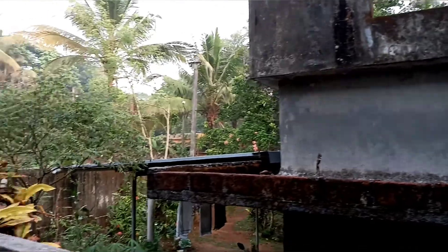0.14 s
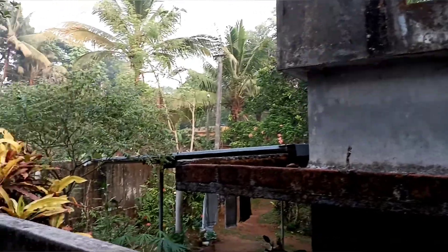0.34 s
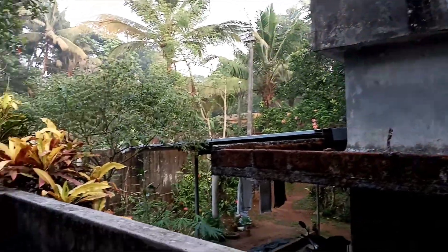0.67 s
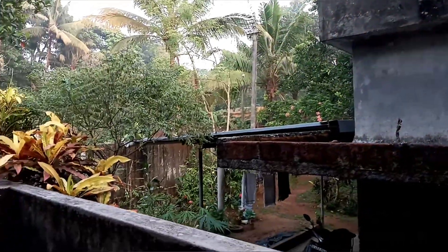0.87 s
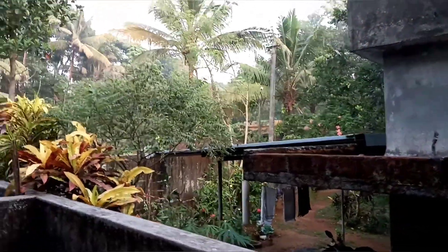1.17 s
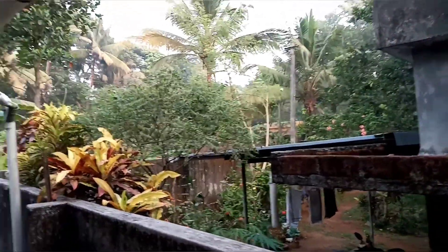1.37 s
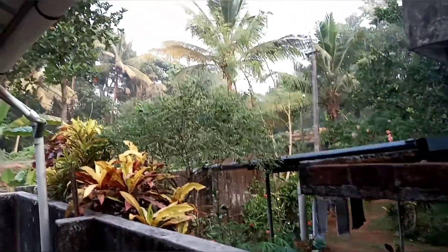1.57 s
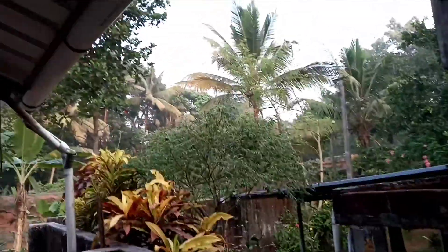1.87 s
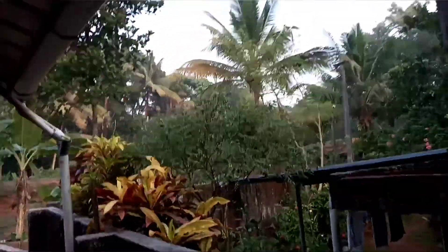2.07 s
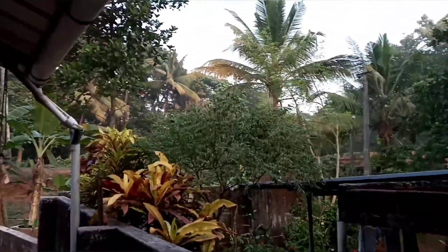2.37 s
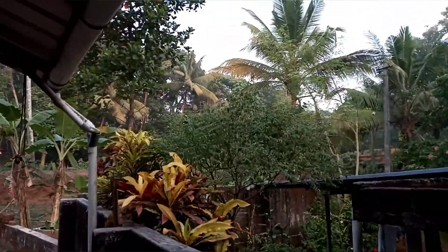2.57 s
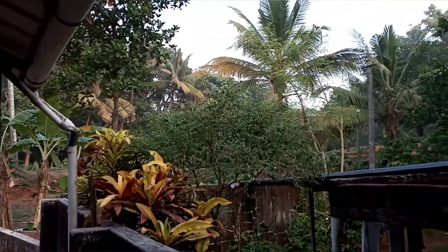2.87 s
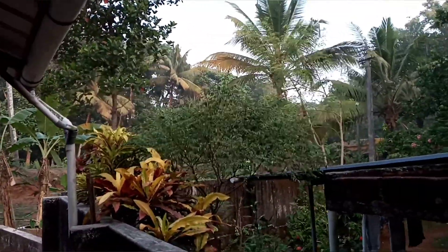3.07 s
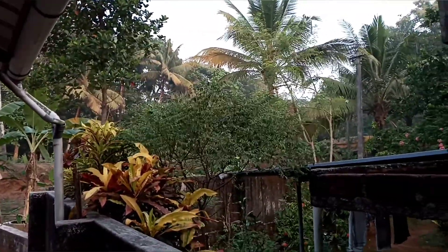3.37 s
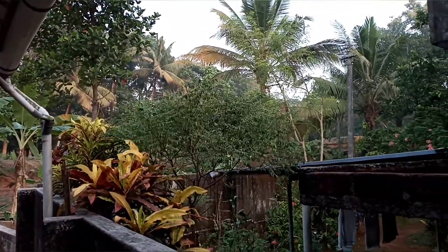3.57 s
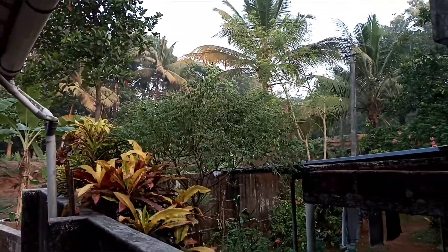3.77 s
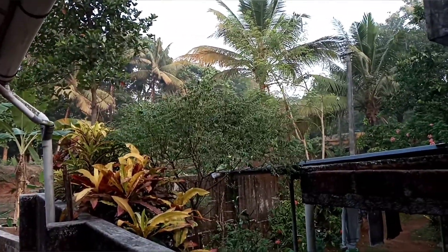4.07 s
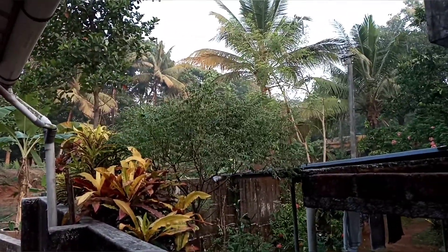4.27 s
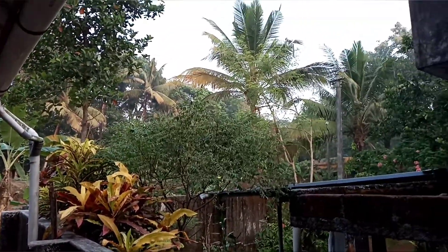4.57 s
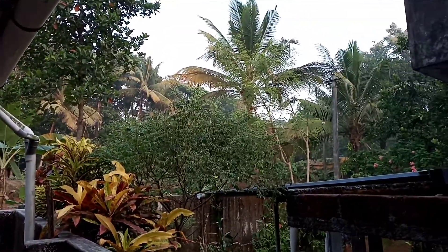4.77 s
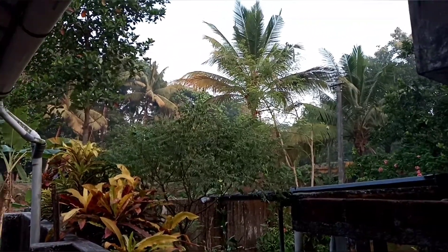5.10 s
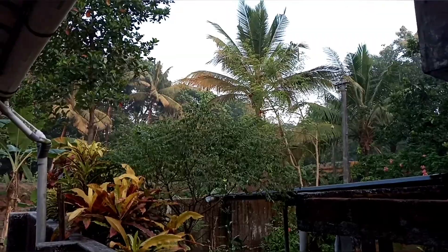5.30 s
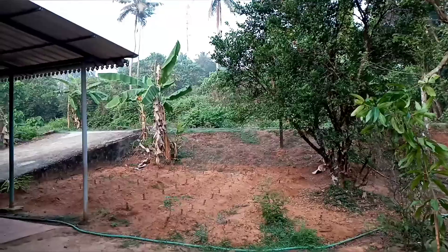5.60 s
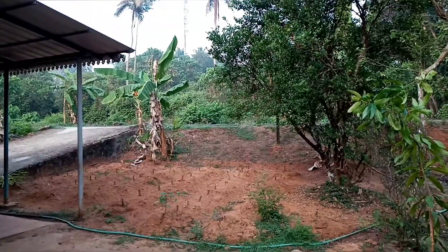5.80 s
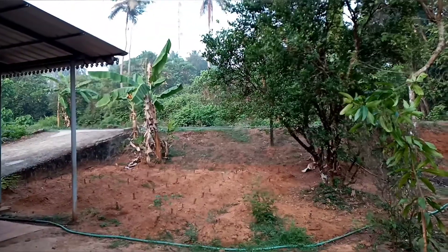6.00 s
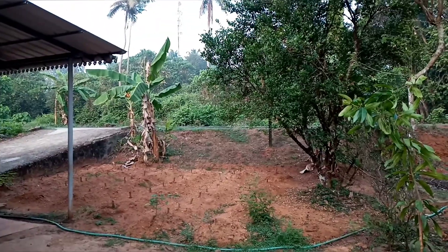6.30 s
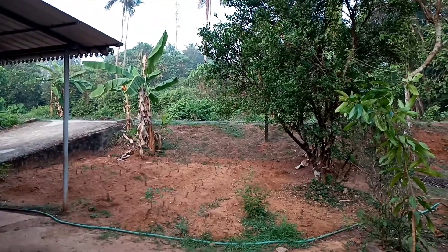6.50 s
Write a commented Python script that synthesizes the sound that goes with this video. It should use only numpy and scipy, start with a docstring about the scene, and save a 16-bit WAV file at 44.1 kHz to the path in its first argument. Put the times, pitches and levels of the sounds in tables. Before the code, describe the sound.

Lively tropical garden birds at dawn: a steady hollow tooting, falling whistles, buzzes and chirps over shrill insects, with a sharp click and handling knocks.

```python
"""Buzzing notes, scolding and a thin held whistle open a tropical garden at dawn, over shrill insects.
A barbet then toots steadily, a second bird whistles falling phrases and small birds chirp among the trees.
Close by: a sharp click, a short scuff, dry ticks, soft knocks on the case and a late thump on the microphone.
For the last second the terrace gives way to the open yard: fainter insects, a stronger breeze, a far crow.
Birds are gliding or shaken sines with random echoes; insects and air are filtered noise; knocks ring modes."""
import sys
import numpy as np
from scipy import signal
from scipy.fft import rfft, irfft, next_fast_len
from scipy.io import wavfile

SR = 44100
rng = np.random.default_rng(int(sys.argv[2]) if len(sys.argv) > 2 else 0)


def wrap_up_sound(samples):
    """Save the sound to the file named by the first command line argument, as 16-bit audio."""
    columns = np.atleast_2d(samples).T
    # keep every value between -1 and 1, then stretch to whole-number steps
    tamed = np.clip(columns, -1, 1)
    steps = np.round(tamed * 32767).astype(np.int16)
    wavfile.write(sys.argv[1], SR, steps)


N = 293265
TIME = np.arange(N) / SR
YARD_S = 5.575   # terrace before, open yard after
FLUTTER_DB, FLUTTER_PER_S = 3, 140   # quick flicker in the strength of every note
RASP_SPREAD = 0.1314   # half width as a share of the centre pitch


def from_db(db):
    """Decibels to gain."""
    return 10 ** (np.asarray(db) / 20)


def rms_one(x):
    """Scale to unit rms."""
    return x / np.sqrt(np.mean(x ** 2) + 1e-20)


def add(out, start_s, sound):
    """Mix a sound in at a time, cut at the end of the scene."""
    start = int(start_s * SR)
    out[start:start + len(sound)] += sound[:N - start]


def band(x, low_hz, high_hz, order=2):
    """Butterworth band-pass."""
    sos = signal.butter(order, [low_hz, high_hz], "band", fs=SR, output="sos")
    return signal.sosfilt(sos, x)


def drift(rate_per_s, count=N):
    """Random wander: straight lines between normal draws of spread 1."""
    steps = np.arange(count) * rate_per_s / SR
    knots = int(steps[-1]) + 2
    return np.interp(steps, np.arange(knots), rng.standard_normal(knots))


def coloured(spectrum):
    """Noise of unit rms whose spectrum follows a curve over log frequency."""
    curve_hz, curve_db = np.transpose(spectrum)
    size = next_fast_len(N)
    bin_hz = np.arange(size // 2 + 1) * SR / size
    gain = from_db(np.interp(np.log(bin_hz + 1), np.log(curve_hz), curve_db))
    return rms_one(irfft(rfft(rng.standard_normal(size)) * gain, size)[:N])


def noise_band(low_hz, high_hz, order=2):
    """Band of noise of unit rms."""
    return rms_one(band(rng.standard_normal(N), low_hz, high_hz, order=order))


def ring(force, hz, t60_s):
    """Two-pole resonator: a unit impulse starts a decaying sine of height about 1."""
    radius = from_db(-60 / (t60_s * SR))
    angle = 2 * np.pi * hz / SR
    poles = [1, -2 * radius * np.cos(angle), radius * radius]
    return signal.lfilter([0, np.sin(angle)], poles, force + 1e-18)


def envelope(start_s, attack_s, hold_s, release_s):
    """Straight rise, hold and straight fall."""
    corners_s = np.cumsum([0, attack_s, hold_s, release_s])
    return np.interp(TIME - start_s, corners_s, [0, 1, 1, 0])


def garden(x, wet_db, t60_s, echoes_per_s=900):
    """Trunks, leaves and walls return many small echoes that die away."""
    t = TIME[:SR]
    present = (rng.random(SR) < echoes_per_s / SR) * (t > .012)
    echoes = rng.standard_normal(SR) * present * np.exp(-np.log(1000) * t / t60_s)
    wet = signal.fftconvolve(x, echoes / np.sqrt(np.sum(echoes ** 2)))[:N]
    return x + from_db(wet_db) * wet


def far_off(x, direct_db, t60_s):
    """Foliage weakens the direct sound, so that the echoes carry the call."""
    return from_db(direct_db) * garden(x, wet_db=-direct_db, t60_s=t60_s, echoes_per_s=2000)


def slur(length_s, start_hz, middle_hz, end_hz, waver, edge, harmonics=((1, 0),), swell_db=0,
         wavers_per_s=250):
    """A wavering tone gliding through three pitches, its level sloping by swell_db, as from a syrinx; rms 1."""
    u = np.linspace(0, 1, int(length_s * SR))
    glide = np.polyfit([0, .5, 1], [start_hz, middle_hz, end_hz], 2)
    hz = np.polyval(glide, u) * (1 + waver * drift(wavers_per_s, count=len(u)))
    phase = 2 * np.pi * np.cumsum(hz) / SR
    tone = sum(from_db(db) * np.sin(k * phase) for k, db in harmonics)
    strength = from_db(swell_db * u + FLUTTER_DB * drift(FLUTTER_PER_S, count=len(u)))
    return rms_one(tone * strength * signal.windows.tukey(len(u), edge))


def notes(table, **voice):
    """Slurred notes, each at its time and rms level."""
    out = np.zeros(N)
    for start_s, length_s, start_hz, middle_hz, end_hz, level_db in table:
        add(out, start_s, from_db(level_db) * slur(length_s, start_hz, middle_hz, end_hz, **voice))
    return out


def rasp(length_s, centre_hz, width_hz):
    """A tone shaken fast and unevenly in pitch; rms 1."""
    size = int(length_s * SR)
    hz = centre_hz + 0.837 * width_hz * drift(900, count=size)
    tone = np.sin(2 * np.pi * np.cumsum(hz) / SR) * signal.windows.tukey(size, .5)
    return rms_one(band(tone, centre_hz - width_hz, centre_hz + width_hz))


def air():
    """Open air, a settling distant rumble, breeze, dull bumps and a low thump of the hand on the microphone."""
    # relative spectrum: centre_hz, level_db_per_hz
    air_colour = [(25, -14), (50, -23), (90, -1.5), (140, 0.5), (190, 4.5), (250, -4.5), (340, -5),
                  (520, -14.5), (1000, -14.5), (1700, -13), (3000, -19), (5500, -32), (11000, -38.5),
                  (13500, -39.5), (15300, -34)]
    # low swells, first a gust, then part of the hand thump: peak_s, half_length_s (to 1/e), level_db
    low_swells = [(1.797, 0.55, -76), (6.6, 0.029, -51.5)]
    # low wavering notes, dull bumps and last the hand thump: start_s, length_s, centre_hz, level_db
    low_notes = [(.33, 0.082, 198.8, -64), (0.521, 0.064, 284, -68), (0.708, 0.081, 207, -59),
                 (0.936, 0.075, 300, -67.5), (1.301, 0.12, 319, -67.5), (1.5, 0.048, 176, -73),
                 (1.84, 0.058, 147, -64.5), (2.02, 0.071, 139.1, -63), (2.42, 0.086, 329, -66.5),
                 (5.381, 0.27, 312.4, -68.5), (6.631, 0.0268, 101, -37.5)]
    terrace_breeze_db, yard_breeze_db = -81.5, -64
    rumble_db, rumble_fade_db_per_s = -80.5, 5

    flow = from_db(np.where(TIME < YARD_S, terrace_breeze_db, yard_breeze_db))
    for peak_s, half_length_s, level_db in low_swells:
        flow = flow + from_db(level_db) * np.exp(-((TIME - peak_s) / half_length_s) ** 2)
    low_noise = flow * from_db(4.0 * drift(15)) * noise_band(56, 116, order=3)

    bumps_and_thump = notes([(start_s, length_s, hz, hz, hz, db) for start_s, length_s, hz, db in low_notes],
                            waver=0.11, edge=0.47)
    lumps_db = 5.6 * drift(12)
    rumble = from_db(rumble_db - rumble_fade_db_per_s * TIME + lumps_db) * noise_band(150, 350, order=3)
    return from_db(-68) * coloured(air_colour) + low_noise + rumble + bumps_and_thump


def insects():
    """Each choir is a narrow shrill band of noise that throbs unevenly."""
    # choirs: centre_hz, width_hz, level_db, throbs_per_s, throb_depth (0-1), yard_change_db
    choirs = [(4675, 480, -71, 2.7, 0.41, -6), (6225, 207, -66, 27, 0.11, -9),
              (6537, 300, -68, 20, 0.4, -9.5), (7884, 260, -71.5, 9.5, 0.75, -17),
              (7480, 580, -77, 3.5, 0.3, -18), (9076, 700, -66, 40, 0.24, -5)]
    out = np.zeros(N)
    in_yard = np.clip((TIME - YARD_S) / 0.02, 0, 1)
    for centre_hz, width_hz, level_db, throbs_per_s, depth, yard_change_db in choirs:
        rate_per_s = throbs_per_s * (1 + .7 * drift(18))
        beat = np.sin(2 * np.pi * np.cumsum(rate_per_s) / SR)
        throb = (1 + depth * beat) * from_db(0.56 * drift(9))
        choir = noise_band(centre_hz - width_hz / 2, centre_hz + width_hz / 2)
        out += from_db(level_db + yard_change_db * in_yard) * throb * choir
    return band(out, 4160, 9520, order=10)


def flock(low_hz, high_hz, spread_db, count):
    """Short glides at random pitches and strengths, blurred by the trees; rms 1."""
    out = np.zeros(N)
    for k, (when, pitch, length, glide, strength) in enumerate(rng.random((count, 5))):
        hz = low_hz * (high_hz / low_hz) ** pitch
        bend = 0.206 * (glide - .5)
        call = slur(0.0305 + 0.0509 * length, hz * (1 - bend), hz, hz * (1 + bend), waver=0.017, edge=0.95)
        add(out, (k + when) / count * TIME[-1], from_db(spread_db * strength) * call)
    return rms_one(far_off(out, direct_db=-25.5, t60_s=0.49))


def chorus(low_voices_db=-14):
    """Many farther birds chirp at random, with a few low voices beneath, on a moving level."""
    # loudness curve, of which only the scaled swing about its mean is used: time_s, level_db
    loudness = [(0.0, -74.5), (1.84, -77), (2.11, -70.5), (2.59, -71), (3.64, -91.5), (4.3, -73.5),
                (5.1, -94.5), (6.6, -89.5)]
    mean_db, swing_share = -73.5, 0.57
    curve_db = np.interp(TIME, *np.transpose(loudness))
    level_db = mean_db + swing_share * (curve_db - curve_db.mean())
    high_voices = flock(1650, 5200, spread_db=10.5, count=380)
    low_voices = flock(512, 1487, spread_db=4.5, count=70)
    return from_db(level_db) * (high_voices + from_db(low_voices_db) * low_voices)


def handling():
    """Soft knocks of the hand ring the low modes of the case; the scuff is a dense grainy rub."""
    # hand on case: start_s, level_db, hardness (0-1)
    hand_knocks = [(0.669, -43.5, 0.13), (4.305, -35, .05), (5.3656, -32, 1), (5.466, -42, .03),
                   (5.57, -49, 0.8), (6.091, -43, .03), (6.63, -33.5, .03)]
    # case resonances: mode_hz, level_db, t60_s
    case_modes = [(239, -20.5, 0.021), (370, 0.5, 0.03), (1210, -4.5, 0.0072), (1490, -2, 0.0056)]
    # rubs: start_s, attack_s, hold_s, release_s, level_db, hiss_db (relative to the grain)
    rubs = [(3.901, 0.026, 0.052, 0.053, -36, -32), (3.995, 0.01, 0.011, 0.018, -43.5, -7.5)]
    # relative spectrum of the rub: centre_hz, level_db_per_hz
    rub_colour = [(59, -54), (100, -38), (184, -10), (248, -22.5), (654, -13), (1090, -13), (1340, -1.5),
                  (2000, -3), (2870, -0.5), (4560, -13.5), (6260, -13), (8230, -28), (9340, -29),
                  (10800, -52), (15500, -36)]

    force = np.zeros(N)
    for start_s, level_db, hardness in hand_knocks:
        # a softer contact lasts longer
        contact = signal.windows.hann(int(SR * 0.0023 * (1.08 - hardness)) + 3)
        add(force, start_s - .001, from_db(level_db) * contact / contact.sum())
    knocks = sum(from_db(db) * ring(force, hz, t60_s) for hz, db, t60_s in case_modes)

    scuff = np.zeros(N)
    for start_s, attack_s, hold_s, release_s, level_db, hiss_db in rubs:
        grain = coloured(rub_colour) + from_db(hiss_db) * noise_band(4000, 6700, order=3)
        strength = from_db(level_db + 1.8 * drift(500))
        scuff += envelope(start_s, attack_s, hold_s, release_s) * strength * grain
    return band(knocks, 128, 1900, order=3) + scuff


def ticks():
    """Tiny dry snaps of twigs and leaves: fast-dying band-passed crackle with a short echo."""
    # snaps: start_s, level_db (before trim), centre_hz, t60_s
    snaps = [(0.371, -42, 5400, .045), (0.371, -43, 2870, 0.047), (0.751, -58, 2960, 0.047),
             (.895, -52.5, 6900, 0.12), (.905, -70, 13150, 0.057), (1.246, -57, 3750, .025),
             (1.816, -50.5, 6845, 0.14), (1.826, -35, 6700, .025), (1.825, -66, 13000, 0.056),
             (1.8245, -46, 2950, 0.066), (1.8433, -49, 3800, 0.014), (1.8712, -38.5, 5550, 0.0089),
             (1.883, -46, 6700, 0.036), (1.9834, -50.5, 6300, 0.091), (2.614, -52, 10900, 0.012),
             (4.146, -45, 2000, 0.057), (4.384, -56, 6200, 0.14), (5.834, -49.5, 4900, 0.02),
             (6.25, -48.5, 1410, 0.026), (6.288, -68, 1400, 0.042), (6.584, -53, 1650, 0.08),
             (6.631, -54.5, 1560, 0.13)]
    trim_db = -2.5
    out, t = np.zeros(N), TIME[:SR // 8]
    for start_s, level_db, hz, t60_s in snaps:
        crackle = rng.standard_normal(len(t)) * from_db(3.1 * drift(700, count=len(t)))
        burst = rms_one(band(crackle, hz * 0.64, hz * 1.22, order=3))
        add(out, start_s, from_db(level_db + trim_db) * burst * np.exp(-np.log(1000) * t / t60_s))
    return garden(out, wet_db=-4.5, t60_s=0.13)


def click(tail_db=-42.0, tail_t60_s=0.21):
    """A small hard part snaps and rebounds, ringing its modes, and echoes briefly under the roof."""
    # snap and rebounds: start_s, level_db
    impacts = [(3.3345, -29), (3.3362, -33.5), (3.3422, -46)]
    # resonances of the part: mode_hz, level_db, t60_s
    part_modes = [(780, -15.5, 0.071), (1450, -9, .025), (2210, -0.5, 0.017), (2510, -4, 0.018),
                  (3600, -8, 0.016), (4480, -6, 0.015), (5830, -14, 0.013), (7100, -15, 0.013),
                  (8800, -9.5, 0.006)]
    # relative spectrum of the echo: centre_hz, level_db_per_hz
    tail_colour = [(180, -44), (300, -17), (821, -0.5), (1300, -6), (2040, -0.5), (2400, -7), (7020, -7),
                   (9290, -19), (10400, -37), (15500, -39)]

    hits = np.zeros(N)
    for start_s, level_db in impacts:
        add(hits, start_s, from_db([level_db]))
    body = np.zeros(N)
    for k, (hz, level_db, t60_s) in enumerate(part_modes):
        body += from_db(level_db) * (-1) ** k * ring(hits, hz, t60_s)   # alternate signs

    since_s = TIME - impacts[0][0]
    decay = (since_s > 0) * np.exp(-np.log(1000) * abs(since_s) / tail_t60_s)
    return body + from_db(tail_db) * decay * coloured(tail_colour)


def crow():
    """Hoarse fluttering caws: the yard hears the dying echo of the first caw, then the second caw."""
    # caws: start_s, length_s, start_hz, middle_hz, end_hz, level_db (before hoarseness and filtering)
    caw_notes = [(5.385, 0.169, 518, 550, 514, -51.5), (5.672, 0.182, 509.6, 544.3, 501, -49.5)]
    # voice: harmonic_number, level_db
    caw_harmonics = [(2, -14.5), (3, -4), (4, 0), (5, -24)]
    hoarseness, echo_db = .62, -6.5
    caws = notes(caw_notes, waver=0.031, edge=0.37, harmonics=caw_harmonics, wavers_per_s=660)
    caws = caws * (1 + hoarseness * drift(560))
    direct = band(caws, 1100, 2330, order=3)
    # the trees return mostly the upper part
    echoes = far_off(band(caws, 1670, 2840), direct_db=-22, t60_s=0.68)
    return (direct + from_db(echo_db) * echoes) * (TIME > YARD_S)


def buzz(length_s=0.075, centre_hz=4600, width_hz=610, pulses_per_s=210, jitter=0.25):
    """A very fast, uneven train of tiny pips, each sweeping down in pitch; rms 1."""
    size = int(length_s * SR)
    cycle = np.cumsum(pulses_per_s * (1 + jitter * drift(300, count=size))) / SR % 1
    hz = centre_hz + width_hz * (1 - 2 * cycle + 0.28 * drift(398, count=size))
    pips = np.sin(np.pi * cycle) ** 2 * np.sin(2 * np.pi * np.cumsum(hz) / SR)
    return rms_one(pips * signal.windows.tukey(size, .4))


def rasps():
    """Buzzing notes and broad scolding calls from the bushes, and low hoarse calls beyond them."""
    # one bird's buzz: start_s, level_db
    buzz_notes = [(0, -61), (0.064, -60.5), (0.271, -58.5), (0.489, -57.5), (0.722, -59), (4.507, -58.5),
                  (4.725, -55.5)]
    # scolds: start_s, length_s, centre_hz, level_db
    scold_notes = [(0, 0.08, 9000, -59.5), (.72, 0.15, 7100, -74), (1.14, 0.13, 6310, -63.5),
                   (1.687, 0.085, 5400, -64), (1.69, 0.094, 7250, -63.5), (1.711, 0.22, 4320, -63.5),
                   (1.925, 0.048, 3100, -62.5), (2.274, 0.085, 7100, -75), (2.298, 0.34, 4300, -68.5),
                   (2.32, 0.19, 3090, -69), (2.397, 0.1, 6170, -61.5), (2.627, 0.15, 2730, -82),
                   (2.761, 0.29, 4570, -68.5), (4.339, 0.087, 6260, -62), (4.501, 0.18, 5700, -81),
                   (4.725, 0.043, 5940, -64), (5.569, 0.024, 3410, -65), (5.752, 0.082, 7000, -73),
                   (6.107, 0.076, 3480, -69.5)]
    # low calls: start_s, length_s, pitch_hz, level_db
    low_calls = [(0.026, 0.099, 722, -69.5), (0.362, 0.054, 1128, -66), (2.658, 0.25, 1129, -75.5)]

    buzzes, scolds = np.zeros((2, N))
    for start_s, level_db in buzz_notes:
        add(buzzes, start_s, from_db(level_db) * buzz())
    for start_s, length_s, hz, level_db in scold_notes:
        add(scolds, start_s, from_db(level_db) * rasp(length_s, hz, RASP_SPREAD * hz))
    scolds = band(scolds, 2000, 9500, order=8)
    low = notes([(start_s, length_s, hz, hz, hz, db) for start_s, length_s, hz, db in low_calls],
                waver=0.082, edge=0.4)
    return garden(buzzes, wet_db=-1, t60_s=0.22) + garden(scolds + low, wet_db=-1.0, t60_s=0.32)


def chirps(table, waver, waver_per_octave=0.048, arch_octaves=.025, arch_share=.15):
    """Short glides bowed upward in the middle; the wider the glide, the more bowed and rougher."""
    out = np.zeros(N)
    for start_s, length_s, hz, glide_octaves, level_db in table:
        arch = arch_octaves + arch_share * abs(glide_octaves)
        start_hz, end_hz = hz * 2 ** (np.array([-glide_octaves, glide_octaves]) / 2 - arch)
        roughness = waver + waver_per_octave * abs(glide_octaves)
        chirp = slur(length_s, start_hz, hz, end_hz, waver=roughness, edge=0.31, wavers_per_s=400)
        add(out, start_s, from_db(level_db) * chirp)
    return out


def tsips():
    """Thin falling notes with a strong octave, each breaking into a short rasp just below it."""
    # calls: start_s, level_db
    tsip_notes = [(.062, -59), (1.09, -58), (2.835, -63), (3.42, -58.5), (3.839, -60.5), (4.685, -63),
                  (5.299, -61), (5.564, -70), (6.105, -68)]
    end_length_s, end_hz, end_db = 0.039, 3360, -10.5
    out = np.zeros(N)
    for start_s, level_db in tsip_notes:
        tsip = slur(0.02, 3820, 3720, 3560, waver=.012, edge=.5, harmonics=((1, 0.25), (2, -1.1)))
        ending = rasp(end_length_s, end_hz, RASP_SPREAD * end_hz)
        add(out, start_s, from_db(level_db) * tsip)
        add(out, start_s + 0.0096, from_db(level_db + end_db) * ending)
    return out


def small_birds():
    """Held and rising whistles, chirps near and far, a harsh cry and tsips, each group with its own echoes."""
    # chirps, near and deep in the trees: start_s, length_s, middle_hz, glide_octaves, level_db
    near_chirps = [(0.18, 0.1, 3106, -0.21, -59.5), (0.287, 0.054, 2420, -0.086, -65),
                   (.85, 0.26, 4245, 0.11, -61), (0.96, .15, 5590, 0.0026, -75),
                   (0.998, 0.064, 2500, -0.064, -74.5), (1.115, 0.049, 2760, 0.12, -68.5),
                   (1.325, 0.036, 2480, 0.046, -64), (1.672, 0.039, 4810, 0.12, -59),
                   (2.02, 0.15, 5060, -0.13, -61), (2.051, 0.059, 6680, 0.047, -64),
                   (2.2, .2, 5700, -0.076, -78), (2.225, 0.1, 5085, 0.099, -60),
                   (2.285, 0.061, 3750, 0.044, -68.5), (2.984, 0.047, 2560, -0.12, -78),
                   (4.205, 0.081, 3100, 0.07, -69.5), (5.078, 0.051, 6970, .09, -67.5),
                   (5.535, 0.032, 5640, -0.034, -81), (5.712, 0.07, 4045, 0.082, -69.5),
                   (6.423, 0.098, 2015, 0.084, -72.5), (6.441, 0.047, 1653, -0.0041, -75)]
    far_chirps = [(.07, 0.088, 1800, -.1, -54), (.57, 0.0654, 1886, -0.19, -53),
                  (0.749, 0.075, 3650, 0.35, -66), (1.59, 0.12, 2100, 0.049, -68.5),
                  (2.43, 0.066, 1880, -0.194, -61), (2.5, 0.06, 4080, 0.094, -62.5),
                  (2.55, 0.086, 3330, -0.03, -68), (2.69, 0.086, 3210, -0.2, -71.5),
                  (2.85, 0.18, 1900, -0.24, -74), (3.36, 0.21, 1998, -0.18, -62),
                  (4.37, 0.059, 3610, 0.14, -67.5), (4.49, 0.12, 2766, 0.094, -59.5),
                  (4.87, 0.059, 2340, -0.0073, -64), (4.89, 0.11, 3190, 0.15, -75)]
    # thin held whistles: start_s, length_s, pitch_hz, level_db
    held_whistles = [(0, 0.51, 1604, -64), (0.283, 0.15, 3915, -53.5), (0.615, 0.28, 3962, -57),
                     (0.831, 0.18, 3233, -66.5), (1.132, 0.078, 5580, -58), (1.25, 0.146, 3500, -77),
                     (1.649, 0.056, 4400, -56.5), (3.38, 0.09, 2750, -67.5), (5.105, 0.069, 3520, -71),
                     (6.386, 0.13, 5500, -78)]
    # swelling whistles and harsh falling cries: start_s, length_s, start_hz, middle_hz, end_hz, level_db
    rising_whistles = [(1.178, 0.084, 2832, 3400, 3414, -58.5), (1.432, 0.072, 2790, 3350, 3640, -60.5),
                       (2.19, .078, 2720, 2800, 2980, -60), (3.015, 0.1, 2674, 2970, 2915, -66.5)]
    harsh_cries = [(1.678, .058, 4340, 3745, 3270, -59.5)]

    pipes = notes([(start_s, length_s, hz, hz, hz, db) for start_s, length_s, hz, db in held_whistles],
                  waver=0.0077, edge=0.26)
    rising = notes(rising_whistles, waver=0.017, edge=0.33, swell_db=11.5, wavers_per_s=450)
    cry = notes(harsh_cries, waver=0.06, edge=0.28, swell_db=-8, wavers_per_s=870)
    near = garden(chirps(near_chirps, waver=0.0062) + rising + cry, wet_db=1, t60_s=0.5)
    far = far_off(chirps(far_chirps, waver=.02), direct_db=-4, t60_s=0.56)
    held = garden(pipes, wet_db=-4, t60_s=0.81)
    return near + far + held + garden(tsips(), wet_db=0.0, t60_s=0.5)


def whistler():
    """A far bird repeats a phrase of swelling, gliding notes with long echoes; no note starts in the yard."""
    # phrase: after_s, length_s, start_hz, middle_hz, end_hz, level_db (relative to the phrase)
    phrase = [(0, 0.06, 2000, 1932, 1690, -4), (0.067, 0.098, 1780, 1887, 1735, -3),
              (.2, 0.11, 1950, 1900, 1560, -13), (0.321, .185, 2040, 2176, 1564, -1.5)]
    # repeats, about every two seconds: start_s, level_db
    repeats = [(.052, -51.5), (1.908, -49.5), (3.8, -48.5), (5.5, -52)]
    song = []
    for phrase_s, phrase_db in repeats:
        for after_s, length_s, start_hz, middle_hz, end_hz, level_db in phrase:
            start_s = phrase_s + after_s
            if start_s + length_s / 2 < YARD_S:
                song.append((start_s, length_s, start_hz, middle_hz, end_hz, phrase_db + level_db))
    whistles = notes(song, waver=.014, edge=0.35, swell_db=6)
    return garden(whistles, wet_db=-1.0, t60_s=1.71, echoes_per_s=1800)


def barbet(attack_s=0.002, hold_s=0.031, scoop=.13, settle_s=0.0052, trim_db=1.0):
    """Each toot starts abruptly a little high and drops onto its pitch; house walls return distinct echoes."""
    # toots: time_s, level_db (before trim), pitch_hz
    toots = [(0.6744, -45, 1473), (1.0252, -40, 1514), (1.4263, -39, 1514), (1.82, -36, 1536),
             (2.162, -39.5, 1511), (2.489, -38, 1515), (2.835, -38.5, 1539), (3.211, -40, 1530),
             (3.564, -40, 1486), (4.393, -42, 1514)]
    # house walls: delay_s (before random spread), level_db
    wall_echoes = [(.024, -7.5), (.053, -21)]
    out, t = np.zeros(N), TIME[:SR // 8]
    shape = (1 - np.exp(-(t / attack_s) ** 2)) * np.exp(-(t / hold_s) ** 2)
    for time_s, level_db, pitch_hz in toots:
        hz = pitch_hz * (1 + scoop * np.exp(-t / settle_s) + 0.019 * drift(194, count=len(t)))
        strength = from_db(level_db + trim_db + FLUTTER_DB * drift(FLUTTER_PER_S, count=len(t)))
        toot = strength * shape * np.sin(2 * np.pi * np.cumsum(hz) / SR)
        add(out, time_s - .0025, toot)
        for delay_s, echo_db in wall_echoes:
            echo_s = delay_s * (1 + 0.12 * rng.standard_normal())
            add(out, time_s + echo_s, from_db(echo_db) * toot)
    return garden(out, wet_db=-5.5, t60_s=0.63, echoes_per_s=1500)


def scene():
    """Everything reaches one microphone and feeds both channels."""
    background = air() + insects() + chorus()
    close_by = handling() + ticks() + click()
    birds = crow() + rasps() + small_birds() + whistler() + barbet()
    mono = background + close_by + birds
    return np.array([mono, mono])


def record(dry, hiss_db=-88, cutoff_hz=15750):
    """Add faint electronic hiss at the top of the range, then cut steeply above the cutoff."""
    hiss = from_db(hiss_db) * noise_band(14600, 16500)
    low_pass = signal.ellip(10, .1, 80, cutoff_hz, fs=SR, output="sos")
    return signal.sosfilt(low_pass, dry + hiss)


dry = scene()
out = record(dry)
wrap_up_sound(out)
```